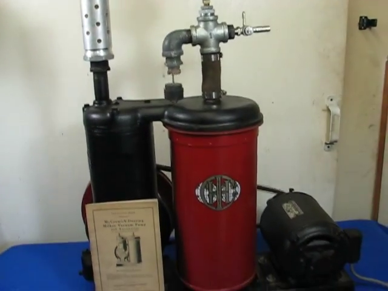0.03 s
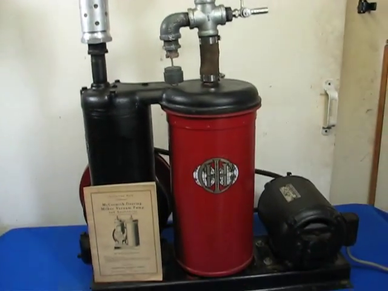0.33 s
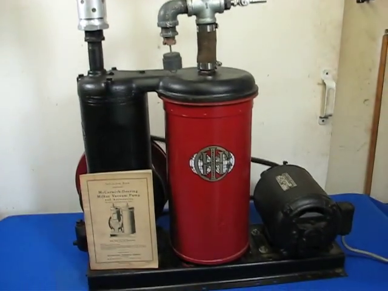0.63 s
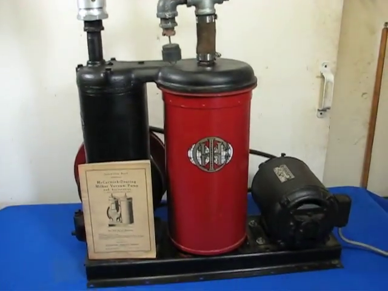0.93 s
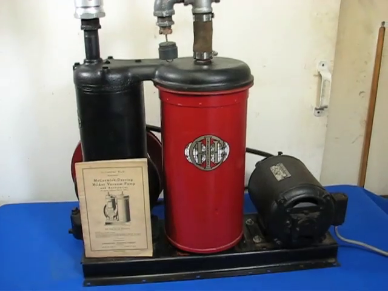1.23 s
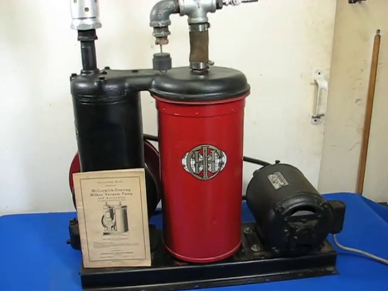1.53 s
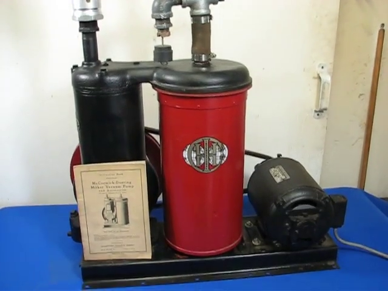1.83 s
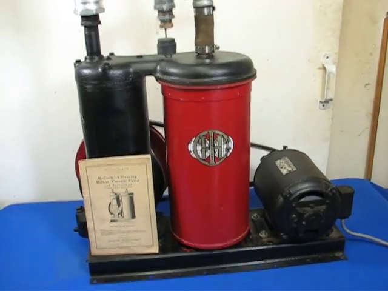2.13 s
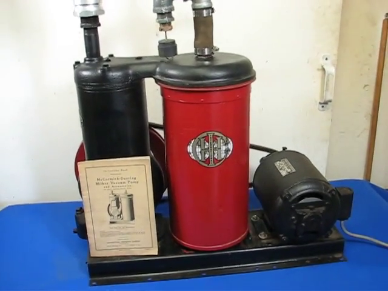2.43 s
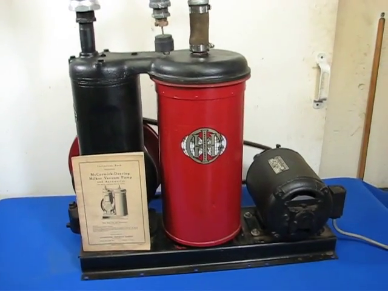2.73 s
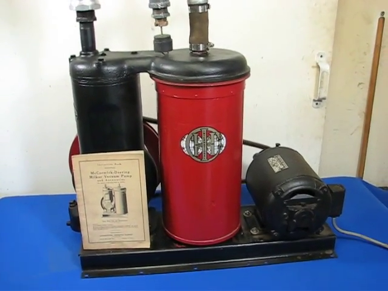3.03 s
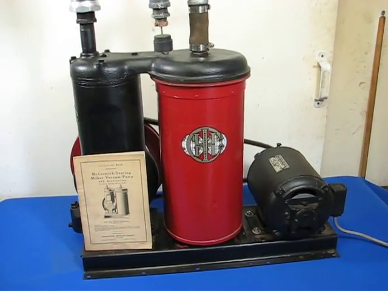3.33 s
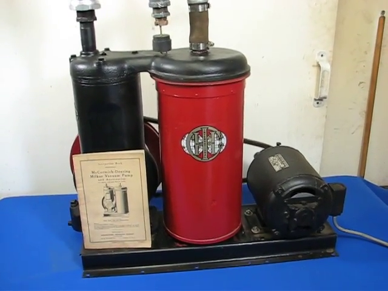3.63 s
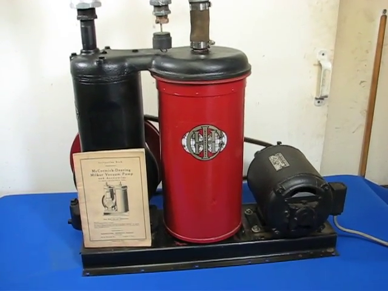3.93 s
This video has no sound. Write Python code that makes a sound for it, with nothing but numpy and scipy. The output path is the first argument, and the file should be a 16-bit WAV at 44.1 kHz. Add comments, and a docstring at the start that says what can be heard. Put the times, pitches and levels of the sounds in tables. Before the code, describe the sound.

A belt-driven vacuum pump chugs in a fast, even rhythm, each stroke knocking and spitting air over motor hum, hiss and light ticks. Near the end the knock turns brighter. It is heard close by in a small workshop.

```python
"""A belt-driven vacuum pump chugs in a small workshop, about a metre away. From the start the motor
hums, the rotor rubs with a hiss and the belt chafes on every lap. Each stroke opens with a soft piston
thump; the exhaust valve flutters upward in pitch, slaps shut, rings the casing and spits air. Light
ticks follow, and near walls throw the knock back. After about three seconds the knock dips briefly
in level and turns higher and brighter, while the hiss grows and the motor swells."""
import sys
import numpy as np
from scipy import signal
from scipy.fft import rfft, irfft, next_fast_len
from scipy.io import wavfile
from scipy.ndimage import uniform_filter1d

SR = 44100
rng = np.random.default_rng(int(sys.argv[2]) if len(sys.argv) > 2 else 0)


def store_pcm(level_fs):
    """Save levels as 16-bit WAV."""
    pcm = np.round(np.clip(level_fs, -1, 1) * 32767).astype(np.int16)
    wavfile.write(sys.argv[1], SR, np.atleast_2d(pcm).T)


N = 176400
STROKE_S, FIRST_STROKE_S, BELT_LAP_S = 0.11757, 0.0245, 0.353

# how strong the strokes are: time_s, level_db
STROKE_STRENGTH = [(0, 1.5), (3.2, 1), (3.35, -1.5), (3.6, -0.5), (3.9, 1.3)]
# how bright the knock is: time_s, brightness_0_to_1
KNOCK_BRIGHTNESS = [(0, 0.11), (3.2, 0.03), (3.45, 0.9), (4, 0.7)]
# the valve's overtones, from twice its pitch up: level_db, delay_s, half_length_s, bright_change_db
VALVE_OVERTONES = [(-17, 0.0037, 0.0031, 1), (-21.5, 0.0012, 0.0029, -6.5), (-29.5, 0.00034, 0.0017, -8.5),
                   (-33.5, 0.0053, 0.003, 5)]
# notes the casing rings with: pitch_hz, level_db, ring_time_s, bright_change_db
CASING_NOTES = [(160, -64, .1, 4), (277.2, -30, 0.24, 9), (377.4, -31, 0.16, 7.5), (494, -30.5, 0.24, 3.5),
                (597.9, -30.5, 0.37, -1), (717, -29, 0.071, -2), (732, -45, 0.17, -10),
                (856.6, -34, 0.14, -16), (899, -28, 0.083, 10.5), (1020, -78, 0.077, 5),
                (1078.4, -30.5, 0.19, 3.5), (1158, -35, 0.3, 3), (2096, -37, 0.043, -2),
                (2220, -47.5, 0.068, 0)]
# tone of the spat air: frequency_hz, level_db
SPIT_TONE = [(300, -0.5), (900, 10), (1450, -4.5), (2300, -1), (4000, 1), (6500, -8), (9000, -13.5),
             (12000, -14), (15000, -17.5)]
# echoes from the table and walls: delay_s, level_db
WALL_ECHOES = [(.00809, -2.5), (0.0124, -10.5), (0.0207, -7.5), (0.0307, -13.5), (0.041, -15),
               (.04982, -29), (.06082, -15.5), (.07147, -23.5)]
# ticks within a stroke: delay_s, length_s, pitch_hz, width_hz, level_db
STROKE_TICKS = [(0.011, 0.0031, 6585, 280, -38.5), (0.11, .003, 6830, 300, -45.5),
                (0.053, .0025, 7200, 2084, -35), (0.018, .003, 11500, 2500, -52)]
# mains hum and tones of the turning shaft: pitch_hz, level_db
HUM_TONES = [(120, -48.5), (146, -49.5), (207.3, -40.5), (236.6, -35.5), (240, -32.5), (266, -37)]
# tone of the drive's rumble: frequency_hz, level_db
RUMBLE_TONE = [(25, -48), (60, -25), (95, -20.5), (150, -11.5), (250, -3.5), (300, -6), (400, 0), (500, -3),
               (600, -9.5), (900, -5), (1200, -16), (1450, -22.5), (2500, -33.5)]
# how loud the hum and rumble are: time_s, level_db
MOTOR_LEVEL = [(0, 1), (1.5, 1), (3.4, -0.5), (3.8, 4.5), (4, 0)]
# steady ringing of the moving parts: pitch_hz, width_hz, level_db
GEAR_RINGS = [(239, 22, -38.5), (459, 30, -40.5), (706, 76, -41.5), (827, 63, -43), (1250, 36, -51),
              (2320, 54, -48), (8270, 450, -50)]
# tone of the rubbing rotor: frequency_hz, level_db
HISS_TONE = [(1400, -1), (1900, 1), (2800, 3.5), (3500, -1), (4300, 4), (5300, -2.5), (6600, 1.5),
             (7500, 0.5), (8400, 4.5), (9600, -9.5), (12000, -12), (15000, -30), (16000, -30)]
# how loud its hiss is: time_s, level_db
HISS_LEVEL = [(0, 0), (1.5, 0), (3.2, -1.7), (3.5, 2.5), (4, 3)]
# spots where the belt chafes: first_peak_s, half_length_s, pitch_hz, width_hz, level_db
BELT_SPOTS = [(0.1, 0.037, 8130, 230, -39.5), (0.118, 0.0065, 6600, 330, -34),
              (0.116, 0.027, 7500, 3000, -40.5), (0.215, 0.024, 8184, 180, -45),
              (0.327, 0.013, 6000, 2200, -39.5)]
# stereo width and balance: frequency_hz, side_gain_db, left_minus_right_db
STEREO_SPREAD = [(60, -43, -1), (250, -24, 1), (400, -23, 0.57), (553, -21, 2), (1010, -11, 0.4),
                 (2000, -9, -2.8), (4600, -4, 0.5), (8450, -4.5, -3.5), (9550, 2, -4.5), (12300, 2, 11),
                 (15500, -5, 6)]


def pump_strokes(t):
    """Each stroke knocks with a thump, a flutter and a ring, never quite the same twice."""
    out = np.zeros(N)
    strokes = np.arange(FIRST_STROKE_S - STROKE_S, N / SR + STROKE_S / 2, STROKE_S)
    for stroke_s, (late, force, detune, harsh) in zip(strokes, rng.standard_normal((len(strokes), 4))):
        near = (t > stroke_s - STROKE_S / 2) & (t < stroke_s + 2 * STROKE_S)
        age = t[near] - stroke_s - 0.00023 * late
        bright = curve(KNOCK_BRIGHTNESS, stroke_s)
        knock = valve_flutter(age, bright, detune, harsh) + casing_ring(age, bright) + piston_thump(age)
        out[near] += knock * gain(curve(STROKE_STRENGTH, stroke_s) - 0.06 * force)
    return out


def valve_flutter(age, bright, detune, harsh, pitch_hz=405.3, glide_hz_per_s=5960):
    """The exhaust valve flutters in a short rising burst that turns harsh at full flow."""
    hz = pitch_hz * (1 + 0.0045 * detune + 0.06 * bright)
    phase = 2 * np.pi * (hz * age + glide_hz_per_s * age ** 2 / 2)
    flutter = gain(-8.5) * swell(age, rise_s=0.0094, fall_s=0.0069, bluntness=1.43) * np.sin(phase)
    for multiple, (db, delay, length, change) in enumerate(VALVE_OVERTONES, start=2):
        level = gain(db + 0.6 * harsh + change * bright)
        flutter += level * swell(age - delay, length, length) * np.sin(multiple * phase)
    return flutter


def casing_ring(age, bright, slap_s=0.002034, softness_s=0.0045):
    """The valve slaps shut and sets the casing ringing."""
    since_slap = age - slap_s
    onset = (1 + np.tanh(since_slap / softness_s)) / 2
    ring = 0
    for hz, db, ring_s, change in CASING_NOTES:
        level = gain(db + change * bright) * onset * fade(np.maximum(since_slap, 0), ring_s)
        ring += level * np.sin(2 * np.pi * hz * since_slap)
    return ring


def piston_thump(age, pitch_hz=69, lead_s=0.0174):
    """The piston gives a low thump just ahead of the flutter."""
    return gain(-41.5) * swell(age + lead_s, 0.023, 0.023) * np.sin(2 * np.pi * pitch_hz * (age + lead_s))


def air_spit(t, delay_s=0.0052):
    """The valve spits a little air with each slap."""
    age = from_nearest_repeat(t, FIRST_STROKE_S + delay_s, STROKE_S)
    return gain(-29) * swell(age, rise_s=0.0039, fall_s=0.011) * noise(tone_shape(SPIT_TONE))


def workshop(sound, ring_s=0.087, low_cut_hz=870):
    """Adds wall echoes, duller the later they come, and a short wash of sound; gives mid and side."""
    size = next_fast_len(N + SR)
    hz, t = np.fft.rfftfreq(size, 1 / SR), np.arange(SR // 2) / SR
    echoes = [gain(db) * np.exp(-2j * np.pi * hz * delay) / np.hypot(1, hz * delay / 43)
              for delay, db in WALL_ECHOES]
    side = sum((-1) ** k * echo for k, echo in enumerate(echoes))  # left and right in turn
    paths = np.array([1 + sum(echoes), side])
    wash = rng.standard_normal((2, len(t))) * fade(t, ring_s)
    wash *= gain(-0.5) / np.sqrt(np.sum(wash[0] ** 2))
    paths += rfft(wash, size) * hz ** 4 / (hz ** 4 + low_cut_hz ** 4)
    return irfft(rfft(sound, size) * paths, size)[:, :N]


def mechanism_ticks(t):
    """The mechanism ticks crisply at the same points in every stroke, a little unevenly."""
    out = 0
    for delay, length, hz, width, db in STROKE_TICKS:
        age = from_nearest_repeat(t, FIRST_STROKE_S + delay, STROKE_S)
        out += gain(db + 0.5 * drift(20)) * swell(age, length / 2, length * 2) * noise_band(hz, width)
    return out


def motor(t, swing_db=4.5, lead_s=0.021):
    """The hum swells under the load of each stroke, over the rumble and ringing of the drive."""
    load_db = swing_db * np.cos(2 * np.pi * (t - FIRST_STROKE_S + lead_s) / STROKE_S)
    hum = 0
    for hz, db in HUM_TONES:
        level = np.sqrt(2) * gain(db + load_db + 1.5 * drift(4))
        phase = 2 * np.pi * (hz * t + rng.random((2, 1))) + 0.11 * drift(3.9)
        hum += level * np.sin(phase)
    rumble = gain(-32.5) * noise(tone_shape(RUMBLE_TONE))
    ringing = sum(gain(db) * noise_band(hz, width) for hz, width, db in GEAR_RINGS)
    return gain(curve(MOTOR_LEVEL, t)) * (hum + rumble) + ringing


def rotor_hiss(t, ripple_db=3.4, ripple_step_hz=70.3):
    """The rotor rubs with a flickering hiss, coloured by many narrow, randomly placed peaks."""
    peaks_db = ripple_db * rng.standard_normal(1024)
    ripple = gain(np.interp(np.fft.rfftfreq(N, 1 / SR), ripple_step_hz * np.arange(1024), peaks_db))
    level = gain(-36.5 + curve(HISS_LEVEL, t) + 2.25 * drift(90))
    return level * noise(tone_shape(HISS_TONE) * ripple)


def belt_chafe(t):
    """The belt chafes with a thin, high sound that comes back on every lap."""
    out = 0
    for first_s, length, hz, width, db in BELT_SPOTS:
        age = from_nearest_repeat(t, first_s, BELT_LAP_S)
        out += gain(db + 2.5 * drift(6.2)) * swell(age, length, length) * noise_band(hz, width)
    return out


def gain(db):
    """Turns decibels into a multiplier."""
    return 10 ** (np.asarray(db) / 20)


def curve(points, at):
    """Reads between a table's rows along straight lines."""
    return np.interp(at, *np.array(points).T)


def tone_shape(points, column=1):
    """Turns a tone table into a gain for every frequency."""
    rows = np.array(points)
    return gain(np.interp(np.log(np.fft.rfftfreq(N, 1 / SR) + 1), np.log(rows[:, 0]), rows[:, column]))


def noise(tone):
    """Two unrelated noises (mid and side) with the same tone, at a standard level."""
    x = irfft(rfft(rng.standard_normal((2, N))) * tone, N)
    return x / x.std()


def noise_band(hz, width_hz):
    """Noise gathered around one pitch."""
    return noise(1 / (1 + 2 * ((np.fft.rfftfreq(N, 1 / SR) - hz) / width_hz) ** 2))


def drift(rate_hz):
    """A smooth random wander, about 1 in size."""
    hold = int(SR / rate_hz)
    steps = np.repeat(rng.standard_normal(N // hold + 1), hold)
    smooth = uniform_filter1d(uniform_filter1d(steps, hold), hold)[:N]
    return smooth / smooth.std()


def swell(age, rise_s, fall_s, bluntness=2):
    """A hump in level that peaks at age zero."""
    return np.exp(-np.abs(age / np.where(age < 0, rise_s, fall_s)) ** bluntness)


def fade(age, ring_s):
    """Dies away by 60 dB in ring_s."""
    return np.exp(-np.log(1000) * age / ring_s)


def from_nearest_repeat(t, first_s, period_s):
    """Seconds since the nearest repeat, negative before it."""
    return (t - first_s + period_s / 2) % period_s - period_s / 2


def scene():
    """Mixes mid (what both ears share) and side (how they differ), then makes left and right."""
    t = np.arange(N) / SR
    pump = workshop(pump_strokes(t)) + air_spit(t)
    mid, side = rfft(pump + rotor_hiss(t) + mechanism_ticks(t) + belt_chafe(t) + motor(t))
    side *= tone_shape(STEREO_SPREAD)
    lean = np.sqrt(tone_shape(STEREO_SPREAD, column=2))
    left_right = np.array([(mid + side) * lean, (mid - side) / lean])
    return irfft(left_right * 2 / (lean + 1 / lean), N)


def record(dry):
    """Cuts the treble above 15750 Hz."""
    return signal.sosfilt(signal.ellip(10, 0.1, 80, 15750, fs=SR, output="sos"), dry)


dry = scene()
out = record(dry)
store_pcm(out)
```